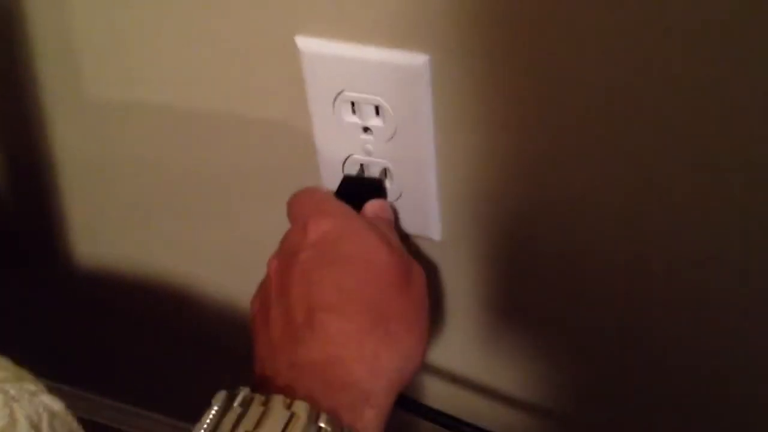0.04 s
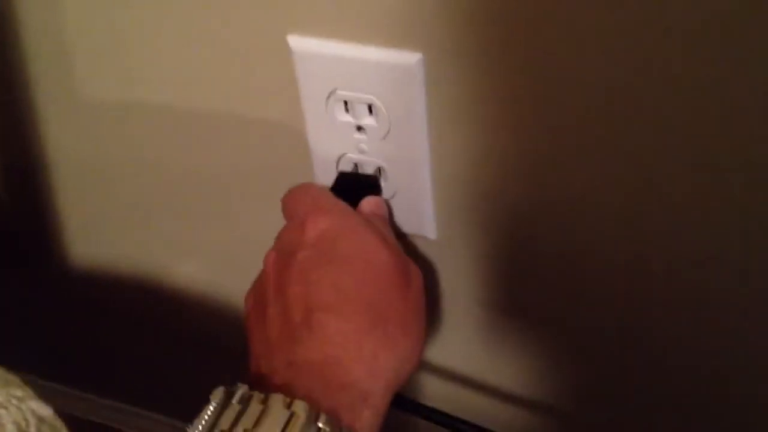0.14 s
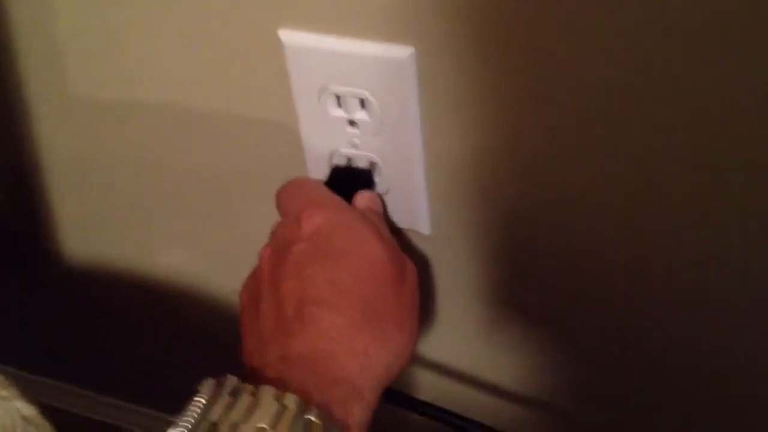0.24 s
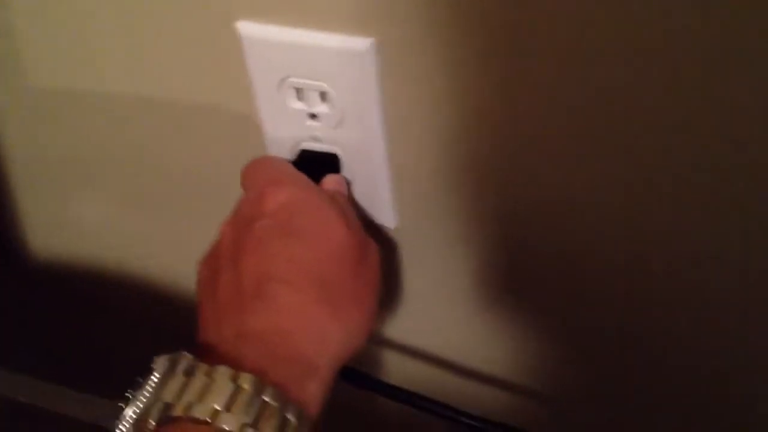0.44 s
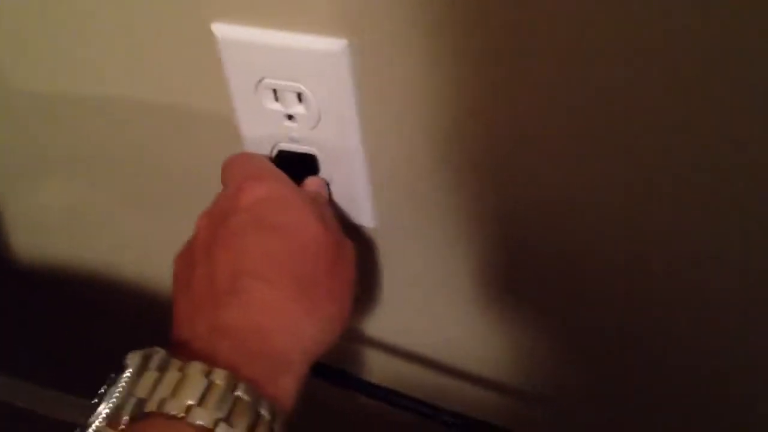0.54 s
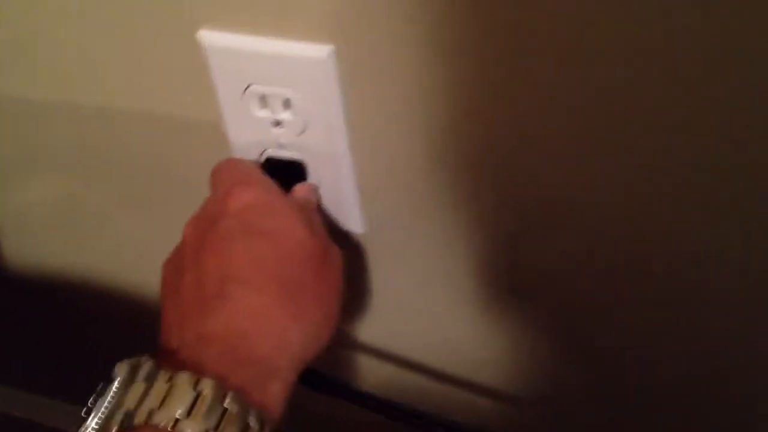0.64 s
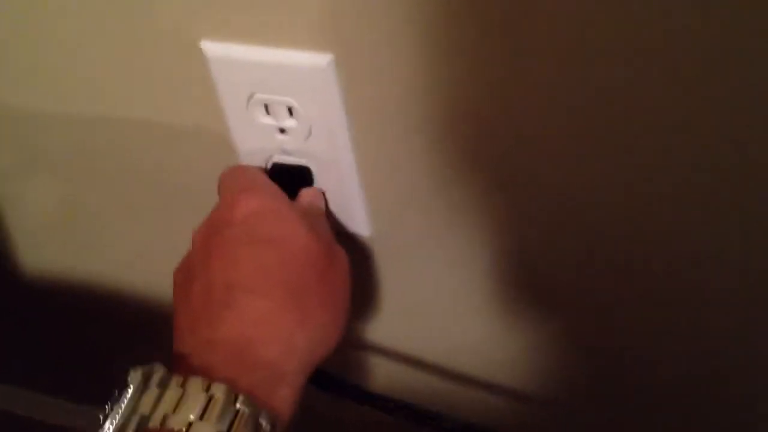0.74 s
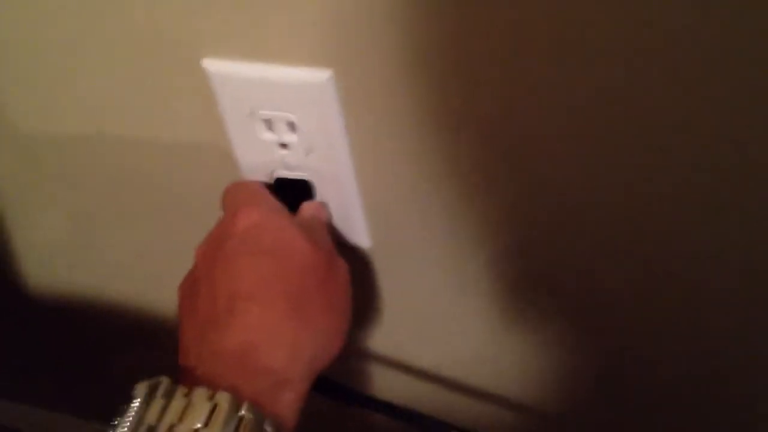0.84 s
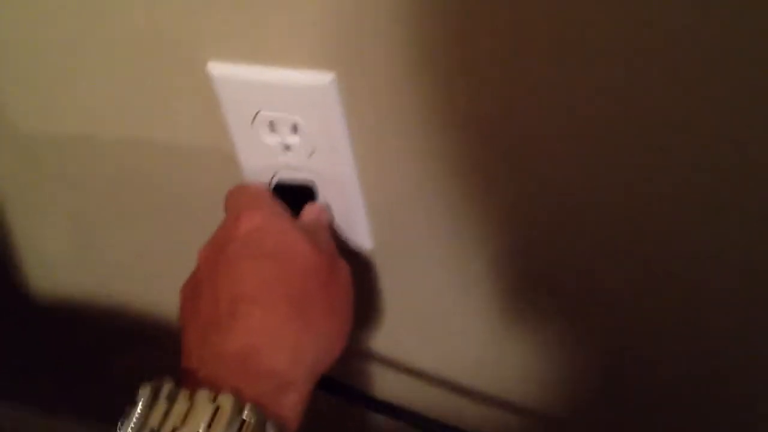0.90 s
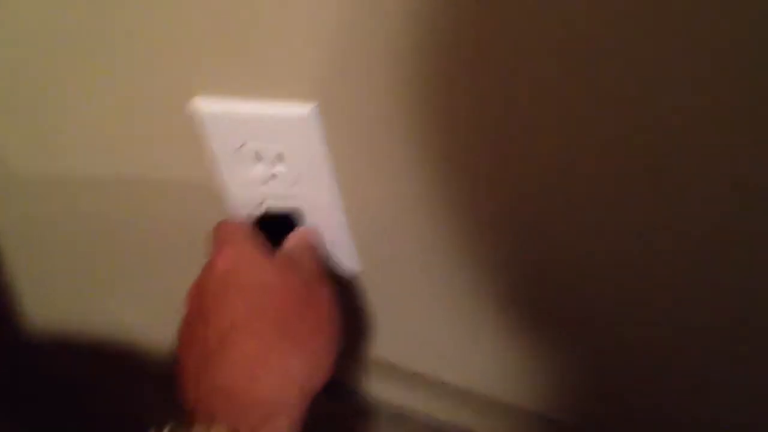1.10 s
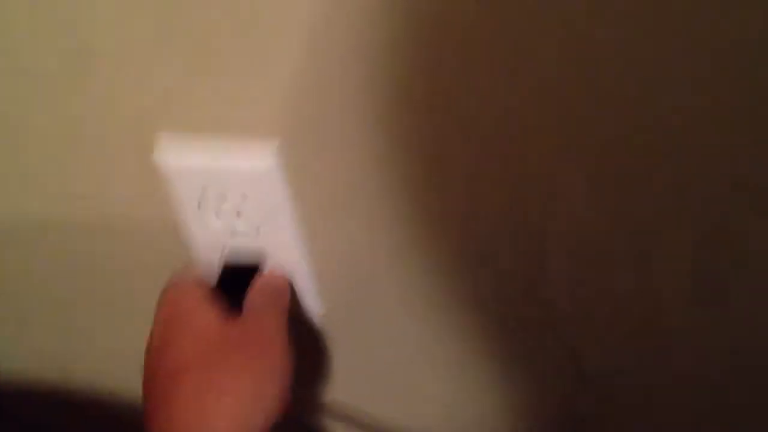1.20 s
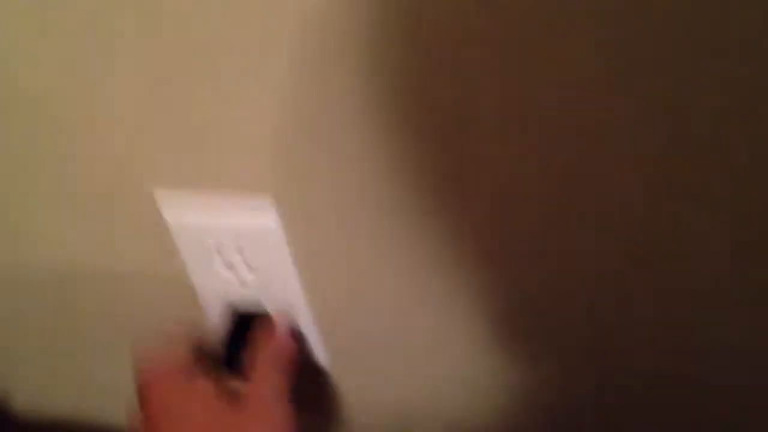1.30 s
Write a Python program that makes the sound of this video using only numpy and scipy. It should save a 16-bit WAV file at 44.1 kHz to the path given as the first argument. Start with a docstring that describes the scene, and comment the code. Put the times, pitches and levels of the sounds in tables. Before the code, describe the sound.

A power plug goes into a wall outlet, heard close in a small, quiet room with soft air and faint hum. Light ticks and gritty scraping start at 0.05 seconds, a sharp metallic snap at 0.22, more sliding, then a hard plastic clack at 0.42 and a click with a low wall thump at 0.46. Very faint finger rubbing follows around 1.0, then small rocking knocks near 1.3.

```python
"""A hand pushes a power plug into a wall outlet in a small, quiet room with soft moving air and a faint hum.
Prongs scrape (gritty noise) and tick at the slots; the push thumps the hollow wall (low, brief swings) and
the fingers rub. The prongs snap past the spring contacts (noise bursts with ringing), then slide on as
the plug knocks home on the cover plate (a noisy clack and ringing plastic), with one last click.
After a pause the fingers rub again, the wall is loaded again and the plug rocks in the socket."""
import sys
import numpy as np
from scipy import signal
from scipy.fft import rfft, irfft
from scipy.io import wavfile
from scipy.ndimage import uniform_filter1d

SR = 44100
rng = np.random.default_rng(int(sys.argv[2]) if len(sys.argv) > 2 else 0)


def pcm_store(signal):
    """Save signal as 16-bit PCM."""
    levels = np.round(np.clip(np.atleast_2d(signal), -1, 1) * 32767)
    wavfile.write(sys.argv[1], SR, levels.astype(np.int16).T)


N = 59535  # length in samples
SPECTRUM_HZ = np.arange(N // 2 + 1) * SR / N


def undb(db):
    """Turn decibels into a gain."""
    return 10 ** (np.asarray(db) / 20)


def along(hz, table, column):
    """Read a table's column at any frequency, joining its points on a log-frequency axis."""
    rows = np.array(table, float)
    return np.interp(np.log(hz + 1e-9), np.log(rows[:, 0]), rows[:, column])


def noise(spectrum):
    """Make noise of rms 1 with the given spectrum, by giving every frequency a random phase."""
    phase = 2 * np.pi * rng.random(len(SPECTRUM_HZ))
    x = irfft(undb(along(SPECTRUM_HZ, spectrum, 1)) * np.exp(1j * phase), N)
    return x / x.std()


def since(start):
    """Count the seconds since a moment, zero before it."""
    return np.maximum(np.arange(N) / SR - start, 0)


def fade(age, rise, t60):
    """Rise quickly while decaying exponentially, by 60 dB in t60 seconds."""
    return (1 - np.exp(-(age / rise) ** 2)) * np.exp(-np.log(1000) * age / t60)


def ring(age, rise, modes):
    """A struck object rings at its own pitches (modes), neighbours swinging in opposite directions."""
    total = np.zeros(N)
    for k, (hz, db, t60) in enumerate(modes):
        swing = np.sin(2 * np.pi * hz * age)
        total += (-1) ** k * undb(db) * swing * fade(age, rise, t60)
    return total


def burst(spectrum, start, rise, t60, count=4):
    """A dense decaying burst of noise whose energy is spread smoothly over the given spectrum."""
    shape = fade(since(start), rise, t60)
    x = noise(spectrum) * shape
    colour = undb(along(SPECTRUM_HZ, spectrum, 1))
    for _ in range(count):
        # restore the smooth spectrum, then silence what has spread outside the burst
        smooth = irfft(colour * np.exp(1j * np.angle(rfft(x))), N)
        x = smooth * np.minimum(10 * shape, 1)
    return x * np.sqrt(np.sum(shape ** 2) / np.sum(x ** 2))


def strikes(events, spectrum, burst_db, t60, rise, modes):
    """Contacts on one object, each with its own brightness: row 0 is noisy bursts, row 1 the ring of its modes."""
    out = np.zeros((2, N))
    for start, db, ring_db, tilt_db in events:
        colour = [(hz, level + tilt_db * np.log2(hz)) for hz, level in spectrum]
        out[0] += undb(db + burst_db) * burst(colour, start, rise, t60)
        out[1] += undb(db + ring_db) * ring(since(start), rise, modes)
    return out


def friction(slides, spectrum, rough_db, size=90):
    """Gritty friction that catches unevenly, swelling and dying with each slide."""
    slide = np.zeros(N)
    for start, length, db in slides:
        slide += undb(db) * np.sin(np.pi * np.minimum(since(start) / length, 1))
    catch = uniform_filter1d(rng.standard_normal(N), size)  # slow random wander
    grit = noise(spectrum) * undb(rough_db * catch / catch.std())
    return slide * grit / grit.std()


# Colour of the soft moving air. Each row: frequency in Hz, relative level in dB per Hz.
AIR_SPECTRUM = [(25, -64), (50, 5), (85, -13), (125, 1), (240, -6.5), (320, -10.5), (450, -11),
                (700, -16.5), (1030, -16.5), (1350, -24.5), (3000, -27), (6000, -29.5), (10000, -35),
                (13500, -30.5), (15000, -34)]
# A distant appliance's hum. Each row: frequency in Hz, rms level in dB.
HUM_TONES = [(118.4, -63), (177.6, -72.5), (236.9, -66), (409.1, -73.5)]


def room_tone(air_db=-57):
    """Soft moving air is steady coloured noise; the faint hum is a few steady sine tones."""
    hum = np.zeros(N)
    for hz, db in HUM_TONES:
        cycles = hz * since(0) + rng.random()
        hum += np.sqrt(2) * undb(db) * np.sin(2 * np.pi * cycles)  # root 2: rms to peak
    return undb(air_db) * noise(AIR_SPECTRUM) + hum


# Prongs sliding in the slots. Each row: start in seconds, length in seconds, level at its strongest in dB.
PRONG_SLIDES = [(0.04, 0.016, -55), (0.085, 0.074, -58), (0.209, 0.013, -46), (0.32, 0.33, -54),
                (1.288, 0.0092, -50), (1.297, 0.011, -44.5)]
# Colour of the scrape. Each row: frequency in Hz, relative level in dB per Hz.
GRIT_SPECTRUM = [(300, -31), (1200, 0.5), (3200, -4), (5200, -1.5), (7000, -7.5), (9500, -10), (13500, -9),
                 (15500, 5.5)]


def prong_scrapes():
    """The prongs catch unevenly as they slide, which makes rough noise."""
    return friction(PRONG_SLIDES, GRIT_SPECTRUM, rough_db=3)


# Metal prongs meeting the contacts. Each row: start in seconds, level of the whole click in dB,
# extra level of its ring in dB, extra brightness of its longer part in dB per octave.
PRONG_CONTACTS = [ (0.0656, -19.5, -25, 1.5), (0.077, -40, -8, -10), (0.1347, -31.5, 8.5, -3),
                  (0.2197, -2, 0.5, 0.5), (0.4624, -16, -12, 2), ]
# Colour of the click's short treble part. Each row: frequency in Hz, relative level in dB per Hz.
SHORT_SPECTRUM = [(2000, -40), (6000, -4.5), (8000, -7), (12000, 6.5), (15500, 0)]
# Colour of the click's longer, fuller part, before a click's extra brightness. Each row: frequency in Hz,
# relative level in dB per Hz.
LONG_SPECTRUM = [(100, -3), (400, -0.5), (800, -1.5), (1200, 4), (1650, -2), (2400, 6), (3500, 2.5),
                 (4700, 5.5), (5600, -5), (7500, 5), (9000, -3.5), (12000, -1), (15500, -7.5)]
# Ring of the socket and prongs. Each row: pitch in Hz, relative level in dB, time to fade by 60 dB in seconds.
SOCKET_RING = [(990, -20, 0.01), (1244, -21.5, 0.02), (2112, -29, 0.045), (2540, -40.5, 0.28),
               (3420, -35.5, 0.075), (4630, -29.5, 0.028), (9760, -35, 0.06)]
SHORT_DB, SHORT_RISE_S, SHORT_T60_S = -14, 0.00017, 0.0055  # levels are added to each click's own
LONG_DB, LONG_T60_S, LONG_RISE_S = -18, 0.019, 0.00062


def prong_clicks():
    """Each click is two noise bursts: a brief treble one and a longer, fuller one, with ringing."""
    short = np.zeros(N)
    for start, db, _, _ in PRONG_CONTACTS:
        short += undb(db + SHORT_DB) * burst(SHORT_SPECTRUM, start, SHORT_RISE_S, SHORT_T60_S)
    longer, rings = strikes(PRONG_CONTACTS, LONG_SPECTRUM, LONG_DB, LONG_T60_S, LONG_RISE_S, SOCKET_RING)
    return np.array([short + longer, rings])


# The hand loading the wall. Each row: start in seconds, level in dB, pitch in Hz.
WALL_PUSHES = [(0.104, -36.5, 169), (0.222, -33, 204), (0.24, -39.5, 214), (0.4639, -24.5, 172.2),
               (1.202, -42, 192), (1.2651, -35, 191), (1.288, -37, 175), (1.308, -37, 170)]


def wall_thumps(rise_s=0.0016, t60_s=0.056):
    """The hollow wall swings for a few cycles under each push."""
    total = np.zeros(N)
    for start, db, hz in WALL_PUSHES:
        age = since(start)
        total -= undb(db) * np.sin(2 * np.pi * hz * age) * fade(age, rise_s, t60_s)
    return total


# Fingers rubbing on the plug. Each row: start in seconds, length in seconds, level at its strongest in dB.
FINGER_SLIDES = [(0.115, 0.0089, -52), (0.125, 0.06, -57), (0.945, 0.013, -66.5), (1.05, 0.15, -68)]
# Colour of the rubbing skin. Each row: frequency in Hz, relative level in dB per Hz.
SKIN_SPECTRUM = [(150, -22), (500, -4.5), (1200, -12.5), (3000, -11.5), (7000, -16.5), (15000, -25)]


def finger_rubs():
    """Skin drags unevenly on the plug, which makes soft rough noise."""
    return friction(FINGER_SLIDES, SKIN_SPECTRUM, rough_db=2.5)


# Plug body against the cover plate. Each row: start in seconds, level of the whole knock in dB,
# extra level of its ring in dB, extra brightness of its clack in dB per octave.
PLATE_CONTACTS = [(0.4225, 0, 1.5, -0.5), (1.3057, -25, -8.5, 1.5), (1.3332, -17, -19, -1.5),
                  (1.3395, -18, -1, -4)]
# Colour of the clack, before a knock's extra brightness. Each row: frequency in Hz, relative level in dB per Hz.
CLACK_SPECTRUM = [(100, -19), (400, -7), (700, -2.5), (1000, 2), (1550, -4.5), (2200, 3), (3100, 0),
                  (4400, -3), (6000, -6), (8500, -11), (11500, -10.5), (15500, -24)]
# Ring of the plastic plate and its box. Each row: pitch in Hz, relative level in dB,
# time to fade by 60 dB in seconds.
PLATE_RING = [(513.3, -42, 0.23), (914.4, -37.5, 0.24), (1008, -21.5, 0.046), (1334, -42, 0.38),
              (1987, -26.5, 0.03), (2478, -7, 0.013), (2744, -32.5, 0.09), (3033, -15, 0.025),
              (3355, -16, 0.018), (3763, -27.5, .035)]
CLACK_DB, CLACK_T60_S, KNOCK_RISE_S = -19.5, 0.048, 0.00303  # level is added to each knock's own


def plug_knocks():
    """Plastic on plastic: a softer contact, a dense clack and the plate's modes."""
    return strikes(PLATE_CONTACTS, CLACK_SPECTRUM, CLACK_DB, CLACK_T60_S, KNOCK_RISE_S, PLATE_RING)


# The room's diffuse tail. Each row: frequency in Hz, level against the direct sound in dB,
# time to fade by 60 dB in seconds.
ROOM_TAIL = [(149, 7.5, 0.38), (493, -1, 0.31), (1300, 0.5, 0.28), (2670, -5, 0.32), (6300, -4, 0.23),
             (10900, -7.5, 0.21), (16000, -12, 0.18)]
TAIL_GAP_S, TAIL_BUILD_S = 0.0014, 0.0024
WALL_ECHO_S, WALL_ECHO_DB, WALL_ECHO_TOP_HZ = 0.028, -9.5, 4000


def room(x):
    """A small room: one dull wall echo and a diffuse tail that dies sooner in the treble."""
    white, age, tail = rfft(rng.standard_normal(N)), since(TAIL_GAP_S), np.zeros(N)
    for centre in 62.5 * 2 ** (np.arange(17) / 2):  # half-octave bands, in Hz
        inside = abs(np.log2((SPECTRUM_HZ + 1e-9) / centre)) < 1 / 4
        band = irfft(white * inside, N)
        decay = band * fade(age, TAIL_BUILD_S, along(centre, ROOM_TAIL, 2))
        level = undb(along(centre, ROOM_TAIL, 1)) * band.std()
        tail += level * decay / np.sqrt(np.sum(decay ** 2))
    t = np.arange(N) / SR
    dull = signal.sosfilt(signal.butter(2, WALL_ECHO_TOP_HZ, fs=SR, output="sos"), x)
    wall_echo = undb(WALL_ECHO_DB) * np.interp(t - WALL_ECHO_S, t, dull, left=0)
    return signal.fftconvolve(x, tail)[:N] + wall_echo


def scene(ring_room_db=-14):
    """The plug and outlet, heard from close by; the wall's thumps are heard directly, without echo."""
    tone = room_tone()
    scrapes = prong_scrapes()
    contacts, rings = prong_clicks() + plug_knocks()
    handling = contacts + scrapes + finger_rubs()
    # the ringing of socket and plate is heard mostly directly, with only a faint echo
    echoes = room(handling + undb(ring_room_db) * rings)
    return (tone + handling + rings + wall_thumps() + echoes)[None]


def record(dry, low_cut_hz=134, top_hz=15300):
    """The recorder thins the deep bass and cuts the top of the treble."""
    thin = signal.sosfilt(signal.butter(2, low_cut_hz, "high", fs=SR, output="sos"), dry)
    return signal.sosfilt(signal.ellip(10, 0.2, 80, top_hz, fs=SR, output="sos"), thin)


dry = scene()
out = record(dry)
pcm_store(out)
```